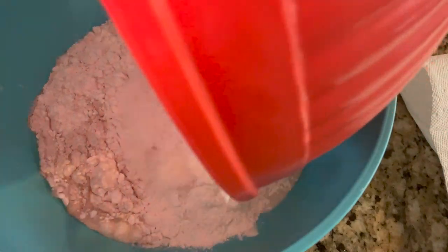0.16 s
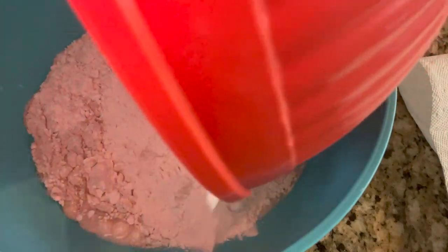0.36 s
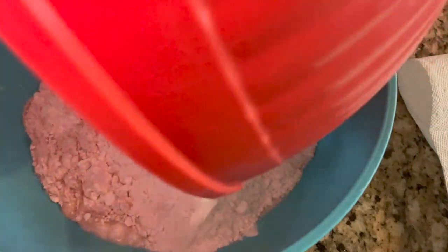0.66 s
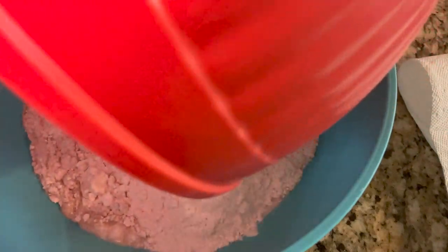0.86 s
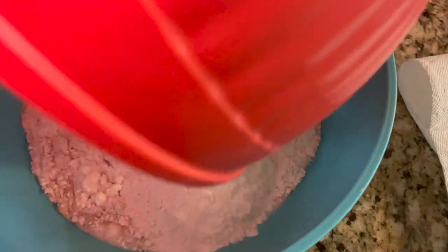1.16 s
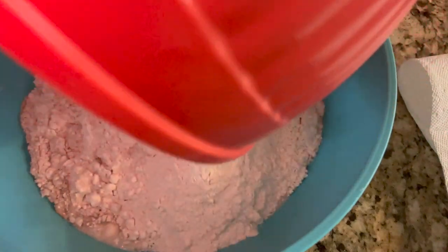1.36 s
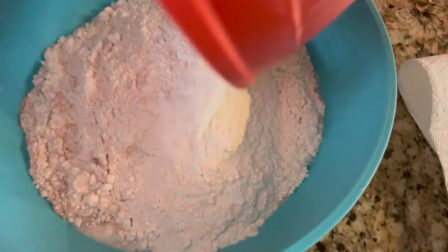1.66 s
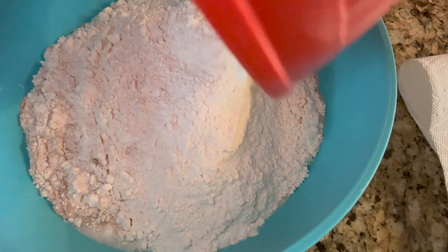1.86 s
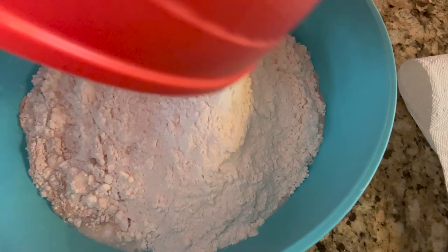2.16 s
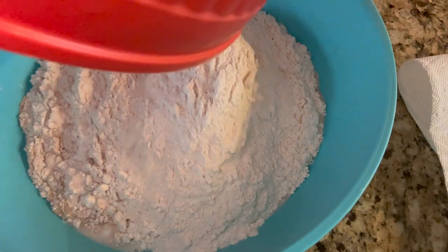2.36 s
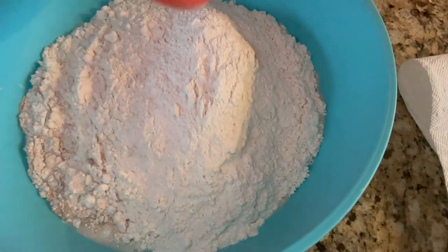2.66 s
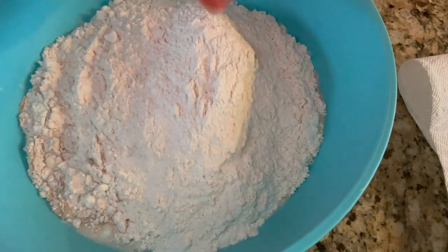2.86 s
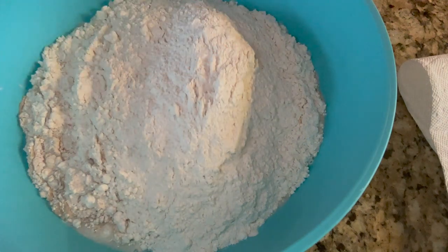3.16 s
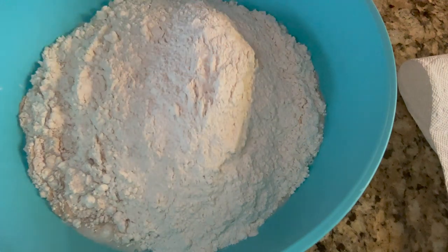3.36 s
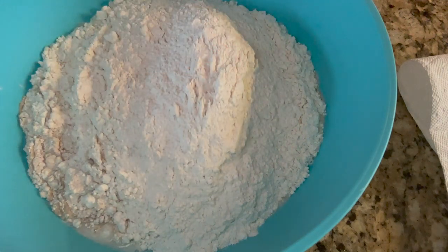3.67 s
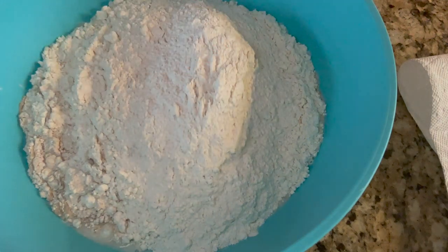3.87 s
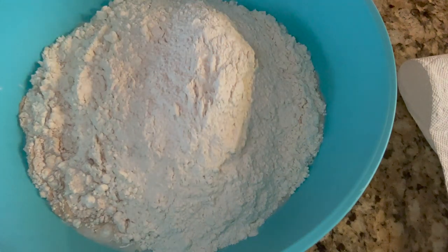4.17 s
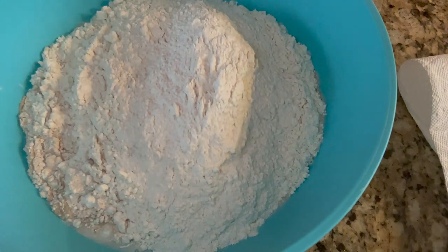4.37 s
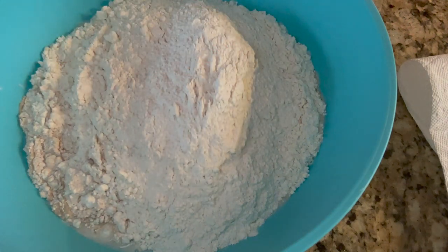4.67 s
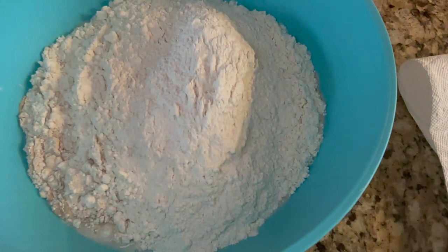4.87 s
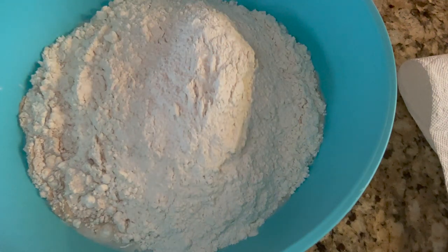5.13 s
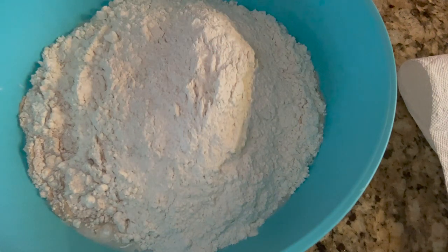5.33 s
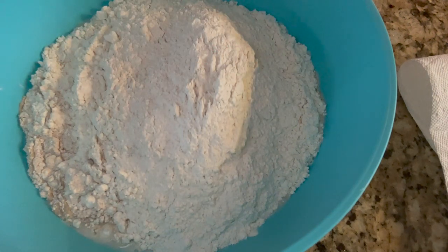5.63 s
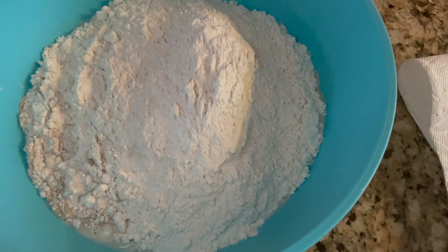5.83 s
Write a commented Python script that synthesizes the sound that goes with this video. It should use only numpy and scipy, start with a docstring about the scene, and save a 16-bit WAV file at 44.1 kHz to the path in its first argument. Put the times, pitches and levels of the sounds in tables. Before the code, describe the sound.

A quiet home kitchen heard closely through a stereo phone microphone. A steady low fridge hum with faint mains buzz and soft house air runs throughout. From 0 to 1.3 s flour slides out of a plastic cup as a faint, fine, grainy hiss, with a light coarse scrape near 0.9 s and tiny ticks up to 1.8 s. Small brushes come around 2.1 and 2.35 s, then it is nearly still. From 3.0 s hands and packets rustle crisply; a stiff lid snaps clearly at 3.44 s, with a much duller click at 4.07 s. Rustling and a slight airy, resonant scrape grow from 4.5 s. At 4.76 s the cup slams onto the stone counter: a very loud, short, clipped hollow thud with plastic crack, rattle and brief room echo. Weaker taps follow at 4.9, 5.08, 5.16, 5.25 and 5.37 s as it rocks to rest. Hum remains, with one tiny brush near 5.9 s.

```python
"""Cup set down in a quiet kitchen

Flour slides out of a plastic cup, hands and packets rustle and a lid clicks, over fridge hum and house air.
Then the cup is set down hard on a stone counter and rocks to rest. Blows and clicks are decaying modes
with a noise echo, rustles are shaped grains, gliding resonances are narrow noise, hum is tones and noise.
A phone's paired ports hear the sound with different phase, the treble in near opposite phase.
"""
import sys
import numpy as np
from scipy import signal
from scipy.fft import rfft, irfft
from scipy.io import wavfile
from scipy.ndimage import uniform_filter1d

SR = 44100
rng = np.random.default_rng(int(sys.argv[2]) if len(sys.argv) > 2 else 0)


def unload_audio(sound):
    """Save the sound as a 16-bit wav file, at the path given as the first command line argument."""
    columns = np.transpose(np.atleast_2d(sound))
    # keep every value between -1 and 1, then stretch to whole-number steps
    steps = np.round(np.clip(columns, -1, 1) * 32767)
    wavfile.write(sys.argv[1], SR, steps.astype(np.int16))


N = 264600
T = np.arange(N) / SR  # s
HZ = np.arange(N // 2 + 1) * SR / N + 1e-6  # kept above zero for the logarithms
LN_1000 = np.log(1000)  # a 60 dB fall

# port pair: [f/Hz, likeness 0-1, right port's lead for diffuse sound/rad, its lead for direct sound/rad]
PORT_PAIR = [(40.2, 1, .1, 2), (165, 0.89, 0.34, -1.16), (385, 0.38, 0.8, -1.67), (495, 0.46, 2.4, -1.5),
             (687, 0.35, 3, -2), (1120, 0.39, 4.42, -2), (1290, 0.31, 3.5, -4), (2390, 0.081, 1.1, -8.5),
             (6100, 0.069, 4.9, -5), (7800, 0.66, 4.4, -12), (8550, 0.89, 4.4, -7), (9460, 1, np.pi, -9),
             (12800, 1, np.pi, -9.5), (13700, .85, 2.1, -4.5), (15500, .55, .9, -10)]


def undb(db):
    """Decibels to amplitude."""
    return 10 ** (np.asarray(db) / 20)


def level(x, db):
    """Set the RMS level."""
    return x * undb(db) / np.sqrt(np.mean(x ** 2))


def across(table, column):
    """A table column over all frequencies, straight on a log axis."""
    return np.interp(np.log(HZ), np.log([row[0] for row in table]), [row[column] for row in table])


def shaped(x, gain):
    """Filter by a gain, or a phase turn, at every frequency."""
    return irfft(rfft(x) * gain, N)


def humps(table):
    """Summed gain of resonances [f/Hz, full width at half amplitude/Hz, level/dB]."""
    return sum(undb(db) / (1 + (2 * (HZ - hz) / width) ** 2) for hz, width, db in table)


def walk(rate):
    """Smoothed random drift of RMS 1, with `rate` new values a second."""
    k = int(SR / rate)
    steps = np.repeat(rng.standard_normal(N // k + 1), k)
    smooth = uniform_filter1d(uniform_filter1d(steps, k), k)
    return level(smooth[:N], 0)


def ring(modes, stretch, rise_ms):
    """Decaying modes of alternate sign that build up while the contact lasts; peak 1, t60 times stretch."""
    t = T[:int(.45 * SR)]
    y = 0
    for k, (hz, db, t60) in enumerate(modes):
        decay = np.exp(-LN_1000 * t / (t60 * stretch))
        y = y + (-1) ** k * undb(db) * decay * np.sin(2 * np.pi * hz * t)
    y = y * (1 - np.exp(-1000 * t / rise_ms))
    return y / np.max(np.abs(y))


def add(out, sound, s, pan_db):
    """Place a sound at s seconds, with left louder than right by pan_db."""
    i = int(s * SR)
    out[:, i:i + sound.shape[-1]] += sound[..., :N - i] * undb(np.array([[pan_db], [-pan_db]]) / 2)


def knocks():
    """Each blow thuds, taps and cracks at once; the counter, a slower ring and a grainy chatter build behind."""
    # the cup meets the counter; blow sets the whole hit, upper is relative to the lingering ring:
    # [t/s, blow/dB, wall tap/dB, rim crack/dB, lingering ring/dB, counter/dB, upper modes/dB,
    #  kitchen echo/dB, left minus right/dB]
    contacts = [(4.7627, 6.5, -18.5, -16.5, -13, -16.5, 4, -9.5, 0.5),
                (4.9014, -26.5, 0, -9, -23, -20, -5, 0, 10), (5.0784, -14.5, 3, -30, -7.5, -5, -14, -5, 0),
                (5.1619, -17.5, 7, 4, -9, -9, -2, -5, 4), (5.231, -33, 6, -22, -1, -3.5, -14, 2, -6),
                (5.2612, -32.5, 15.5, -15, -11, -20, -10, -13, 1),
                (5.3751, -51, 18, -7, -22, -25, -7, -17, -1)]
    # All mode tables: relative levels, t60 before the stretch given to ring().
    # thud of the base: [f/Hz, level/dB, t60/s]
    base_modes = [(296, -9, 0.034), (393, -11.5, 0.038), (516, -1.5, 0.051), (667, -16.5, 0.0095),
                  (750, -16, 0.044), (1426, -17, 0.023)]
    # tap of the thin wall: [f/Hz, level/dB, t60/s]
    wall_modes = [(813, -2.5, 0.029), (1100, 3, 0.0098), (1450, -4, 0.016), (1900, -10.5, 0.015),
                  (2328, 1.5, 0.022), (2780, -10, 0.012), (3100, -10, 0.019), (3413, -6.5, 0.021),
                  (3890, -18, 0.022)]
    # what lingers in cup and counter: [f/Hz, level/dB, t60/s]
    linger_modes = [(267, -9, .22), (359, -10, .25), (392, -11, .2), (445, -9, .18), (500, -14, .15),
                    (515, 0, .38), (550, -7, .22), (625, -11, .25), (670, -19, .2)]
    # upper modes of the lingering ring: [f/Hz, level/dB, t60/s]
    upper_modes = [(932, 1.5, 0.23), (1010, -6, 0.38), (1095, -2.5, 0.29), (1530, -9.5, 0.27),
                   (1601, -1, 0.27), (1647, -9.5, 0.39), (1700, -8.5, 0.28), (1890, -12, 0.22),
                   (1930, -10, 0.23), (2100, -7.5, 0.15), (2518, -3.5, .2), (2630, -7.5, 0.2),
                   (2670, -9, 0.15), (3050, -9, 0.2)]
    # the slab and the cabinet under it, answering late: [f/Hz, level/dB, t60/s]
    counter_modes = [(78, -10, 0.28), (133.5, 3.5, 0.15), (173, -4.5, 0.22), (250, -6.5, 0.14),
                     (296.6, 6.5, 0.13)]
    rattle_t60_s, rattle_damp = 0.69, 0.3  # fall of the jolts; shortening of the modes they strike

    near, far = np.zeros((2, 2, N))
    base, wall = ring(base_modes, 0.47, rise_ms=3.6), ring(wall_modes, 0.63, rise_ms=1.7)
    # the tap that reaches the walls of the room is a blunt push
    push_t60 = LN_1000 * 0.00035
    glance = ring([(1940, 0, push_t60), (3350, -9.5, push_t60)], 0.91, rise_ms=.1)
    low, high = ring(linger_modes, 1.0, rise_ms=1.4), ring(upper_modes, 0.83, rise_ms=2.6)
    counter = ring(counter_modes, 0.93, rise_ms=13.3)
    low_chatter = ring(linger_modes, rattle_damp, rise_ms=1.3)
    high_chatter = ring(upper_modes, rattle_damp, rise_ms=0.31)
    t = T[:len(base)]
    wall = wall * (1 - np.exp(-t / .0012)) * undb(2.5)  # the thin wall takes the blow a moment late
    rim = signal.butter(1, [3000, 7500], "band", fs=SR, output="sos")
    jolt_fall = np.exp(-LN_1000 * t / rattle_t60_s)

    noises = rng.standard_normal((len(contacts), 3, len(t)))
    for contact, noise in zip(contacts, noises):
        s, db, wall_db, crack_db, linger_db, counter_db, upper_db, echo_db, pan_db = contact
        crack_shape = np.exp(-t / 0.0021) * (1 - np.exp(-t / 0.0019)) ** 2
        crack = signal.sosfilt(rim, noise[0]) * crack_shape * undb(7.0 + crack_db)
        blow = base + wall * undb(wall_db) + crack

        # unlike noise at the two ports, in grains of uneven strength, strikes the damped modes
        upper = undb(upper_db - 11)
        grain_db = 3 * level(uniform_filter1d(noise[0], size=250), 0)
        jolts = noise[1:] * undb(grain_db) * jolt_fall
        chatter = low_chatter + undb(13.0) * upper * high_chatter
        rattle = signal.fftconvolve(chatter[None], jolts, axes=1)[:, :len(t)]
        rattle = undb(-9.5) * rattle / np.sqrt(np.sum(jolts ** 2))
        tail = low + upper * high + rattle

        hit = blow + counter * undb(counter_db) + tail * undb(linger_db)
        add(near, hit * undb(db), s, pan_db)
        # only the sharp part goes to the kitchen
        sharp = base * undb(-3.0) + glance * undb(wall_db) + crack
        add(far, sharp * undb(db + echo_db), s, 0)
    return near, echo(far, wet_db=1.0)


def clicks():
    """A stiff lid snaps, ringing itself and the tub with a gritty edge; thinner ticks are brief mode trios."""
    # snaps: [t/s, level/dB, t60 stretch, brightness/dB per octave, tub body/dB, left minus right/dB]
    snaps = [(3.403, -45, 0.79, -11.5, 5, -13), (3.4445, -16, 0.76, 3, -5.5, -1.5),
             (4.0745, -33.5, 0.26, -14, -42, 0)]
    # the lid, relative levels, t60 before stretch: [f/Hz, level/dB, t60/s]
    lid_modes = [(2110, 1, 0.036), (2250, -3, 0.033), (2665, 4, 0.028), (3530, 2, 0.022),
                 (4100, -10, 0.016), (4840, -5, 0.016), (5670, 3.5, 0.006), (6480, -17, 0.02)]
    # the tub under the lid, likewise: [f/Hz, level/dB, t60/s]
    tub_modes = [(468, -4, 0.037), (930, -8, 0.061), (1287, -3.5, 0.038), (1735, -14, 0.067)]
    # thin ticks: [t/s, peak level/dB, centre f/Hz]
    ticks = [(.932, -44, 2600), (1.434, -44.5, 4970), (1.445, -42.5, 10900), (1.767, -39.5, 11850),
             (4.315, -60, 6500), (4.5955, -36, 4600), (4.717, -38, 6300), (4.732, -38.5, 3200),
             (5.065, -43, 7450), (5.193, -49, 6100), (5.3747, -37.5, 7000)]

    near, far = np.zeros((2, 2, N))
    t = T[:2000]
    noises = rng.standard_normal((len(snaps), 2, len(t)))
    for (s, db, stretch, bright_db, tub_db, pan_db), noise in zip(snaps, noises):
        lowest_hz = lid_modes[0][0]
        lid = [(hz, mode_db + bright_db * np.log2(hz / lowest_hz), t60) for hz, mode_db, t60 in lid_modes]
        grit_ring = ring(lid, 0.32, rise_ms=0.16)[None, :400]
        grit = signal.fftconvolve(grit_ring, noise * np.exp(-t / 0.013), axes=1) * undb(-29)
        tub = ring(tub_modes, stretch, rise_ms=0.96) * undb(tub_db)
        snap = ring(lid, stretch, rise_ms=1.0) + tub
        add(near, snap * undb(db), s, pan_db)
        add(near, grit * undb(db), s, pan_db)
        # the kitchen gets a shorter snap without grit
        far_tub = ring(tub_modes, .4 * stretch, rise_ms=0.97) * undb(tub_db)
        far_snap = ring(lid, 0.5 * stretch, rise_ms=0.71) + far_tub
        add(far, far_snap * undb(db), s, 0)
    for s, db, hz in ticks:
        trio = [(0.9 * hz, 0, .003), (hz, 0, .003), (1.32 * hz, 0, .002)]
        tick = ring(trio, 0.41, rise_ms=.05) * undb(db)
        add(near, tick, s, 0)
        add(far, tick, s, 0)
    return near, echo(far, wet_db=-1.1)


def rustle():
    """Flour, hands and packets: dense grains of uneven size in three colours, each flickering alone."""
    # continuous rustle of changing level, first flour pouring, later hands and packets:
    # [t/s, body level/dB, hiss over body/dB]
    stir = [(0, -64, 2.5), (.24, -57, 5.5), (.63, -63, 2), (.83, -63, 3.5), (1.2, -72.5, 8.5),
            (1.45, -88, -3), (2.94, -84, -2), (3.03, -61.5, 3), (3.2, -59.5, 5.5), (3.4, -59, 3.5),
            (3.64, -65.5, -11), (3.78, -68.5, 4.5), (3.9, -59, 0), (4.05, -63.5, -3), (4.28, -67.5, -1),
            (4.5, -63, -3), (4.64, -55.5, 2.5), (4.74, -45, -22), (4.9, -62, -25), (5.03, -78, -21),
            (5.14, -66, -14), (5.185, -45, -15), (5.32, -62, -14), (5.5, -87, -2), (6, -81, 8)]
    # single scrapes, brushes and rattles; rasp and hiss are relative to the body:
    # [peak t/s, swell/s, fade/s, body level/dB, coarse rasp/dB, fine hiss/dB]
    strokes = [(0.885, 0.079, 0.32, -58.5, 12.5, 0), (1.17, 0.18, 0.077, -62.5, 7.5, 2.5),
               (1.349, 0.46, 0.24, -74, 17.5, 7), (2.06, 0.099, 0.7, -73.5, 12.5, -1),
               (2.351, 0.076, 0.063, -57.5, 9, 3.5), (3.015, 0.045, 0.085, -53, 3.5, 9),
               (3.423, 0.011, 0.079, -64, 18.5, 19), (3.48, .12, 0.13, -53, -8, -2),
               (4.315, 0.02, 0.12, -55, 1.5, -9), (4.589, 0.047, 0.082, -45.5, -26, -13),
               (4.763, 0.018, 0.22, -39.5, 8.5, -34), (5.235, 0.035, .06, -50.5, 6, -16),
               (5.33, .1, 0.2, -67, 16, -8), (5.925, .05, 0.043, -65.5, -15, 11)]
    # colour of the coarse rasp, relative levels: [f/Hz, width/Hz, level/dB]
    rasp = [(650, 340, 13), (1150, 300, 6), (1670, 420, -1), (2220, 410, 3.5), (2715, 500, 5.5),
            (3710, 960, -5.5)]
    # colour of the body: [f/Hz, width/Hz, level/dB]
    body = [(3500, 2800, 2.5), (6000, 6100, -3.5)]
    # colour of the fine hiss: [f/Hz, width/Hz, level/dB]
    hiss = [(8570, 3400, 0), (11400, 3000, -2.5), (14300, 2700, -8.5)]
    hold_s, span_db = 0.032, 20.5  # a stroke climbs and drops by span_db over its swell and its fade

    times, *columns = np.transpose(stir)
    stir_db, fine_db = (np.interp(T, times, c) for c in columns)
    power = undb([stir_db + 3, stir_db, stir_db + fine_db]) ** 2
    for s, swell, fade, db, rasp_db, hiss_db in strokes:
        away = np.maximum((s - T) / swell, (T - s - hold_s) / fade)
        away = np.clip(away, 0, None)
        power = power + undb(db - span_db * away) ** 2 * undb([[rasp_db], [0], [hiss_db]]) ** 2
    out = 0
    for colour, gain in zip((rasp, body, hiss), np.sqrt(power)):
        size_db = 2.4 * np.minimum(rng.exponential(size=N), 5)
        grains = rng.standard_normal((2, N)) * undb(size_db)
        flicker_db = .5 * walk(25) + 2.2 * walk(110)
        out = out + level(shaped(grains, humps(colour)), 0) * gain * undb(flicker_db)
    return out


def gliding_resonances():
    """Resonant noise bands, mostly gliding as the cup nears the counter, with randomly wavering level."""
    # narrow bands, level ahead of the swell and wavering:
    # [t/s, length/s, from f/Hz, to f/Hz, width/Hz, level/dB]
    glides = [(4.312, 0.05, 2320, 2320, 140, -49), (4.58, 0.17, 5950, 6750, 450, -54),
              (4.56, 0.23, 2350, 2550, 600, -51), (4.49, 0.13, 5200, 5500, 450, -59),
              (4.53, 0.14, 3600, 4200, 700, -55), (4.68, .09, 3100, 3300, 600, -52)]
    out = 0
    for s, length, from_hz, to_hz, width, db in glides:
        along = np.clip((T - s) / length, 0, 1)
        glide_hz = from_hz + (to_hz - from_hz) * along
        tone = np.sin(2 * np.pi * np.cumsum(glide_hz) / SR)
        slow_noise = shaped(rng.standard_normal((2, N)), humps([(0, width, 0)]))
        swell = np.sin(np.pi * along)
        out = out + level(slow_noise * tone, db) * swell * undb(2.8 * walk(70))
    return out


def fridge():
    """The casing and the room ring as narrow noise bands; the steadier motor tones wander in pitch and level."""
    # hum of the casing and resonances of the room: [f/Hz, wander width/Hz, level/dB]
    hum_bands = [(57, 8.8, -55), (98.2, 6.7, -49.5), (119.6, 5.9, -45.5), (135, 8.2, -50.5),
                 (152.2, 13, -54), (186.2, 13, -55), (223.2, 6, -51.5), (243, 9, -59), (638, 9, -58),
                 (2570, 270, -81.5)]
    # motor turn rate and mains buzz, level before its wander: [f/Hz, level/dB]
    motor_tones = [(58.5, -50.5), (119.8, -44.5)]
    hum = 0
    for hz, width, db in hum_bands:
        band = shaped(rng.standard_normal((2, N)), humps([(hz, width, 0)]))
        hum = hum + level(band, db)
    motor = 0
    for hz, db in motor_tones:
        phase = 2 * np.pi * np.cumsum(hz + 0.726 * walk(1.832)) / SR
        motor = motor + level(np.sin(phase), db) * undb(1.4 * walk(2.5))
    return hum + motor * np.array([[1], [0]])  # motor tones on the first path only


def buzz():
    """Mains overtones, each reaching the two ports with its own strength and phase."""
    buzz_hz = 119.82  # twice the mains rate
    # thin overtones, RMS level before a slight wander: [multiple of buzz_hz, left level/dB, right level/dB]
    overtones = [(2, -55, -59), (3, -58, -58), (13, -80, -80), (14, -79, -78), (16, -77, -82),
                 (17, -77, -76), (19, -81, -86), (20, -84, -90), (21, -72, -78), (22, -70, -74)]
    out = 0
    for (multiple, *side_db), turn in zip(overtones, rng.random((len(overtones), 2, 1))):
        tone = np.sin(2 * np.pi * (multiple * buzz_hz * T + turn))
        out = out + np.sqrt(2) * undb(side_db)[:, None] * tone * undb(.8 * walk(3))
    return out


def house_air():
    """Air moving through the house: coloured noise that swells a little."""
    # air and appliances, relative levels: [f/Hz, level/dB per Hz]
    spectrum = [(20, -45), (43, -17), (70, -18), (105, -5), (150, -6.5), (200, -12), (232, -10.5),
                (270, -15), (600, -19), (1100, -29), (2200, -39.5), (2650, -44), (3200, -52), (5000, -56.5),
                (9000, -57.5), (16000, -64)]
    air = shaped(rng.standard_normal((2, N)), undb(across(spectrum, 1)))
    return level(air, -41) * undb(.5 * walk(1.6))


def echo(x, wet_db):
    """The kitchen answers with two unrelated noise tails, each band dying at its own rate."""
    # kitchen echo, relative strengths: [f/Hz, t60/s, strength/dB]
    kitchen_bands = [(141.5, 0.45, 13), (596, 0.61, -5), (1540, 0.44, -11), (3100, 0.59, -12.5),
                     (6800, 0.13, 0.5), (13900, 0.4, -8.5)]
    t = T[:int(.8 * SR)]
    noise, tail = rng.standard_normal((2, N)), 0
    for hz, t60, db in kitchen_bands:
        band = shaped(noise, np.exp(-(np.log2(HZ / hz)) ** 2))[:, :len(t)]
        onset = np.clip(t / 0.0047, 0, 1)
        tail = tail + undb(db) * band * np.exp(-LN_1000 * t / t60) * onset
    tail = tail / np.sqrt(np.sum(tail ** 2, axis=1, keepdims=True))
    return undb(wet_db) * signal.fftconvolve(x, tail, axes=1)[:, :N]


def ports(first, second):
    """Diffuse sound: left hears one path; right hears it turned in phase, mixed with a second path."""
    like = np.clip(across(PORT_PAIR, 1), 0, 1)
    turned = shaped(first, like * np.exp(1j * across(PORT_PAIR, 2)))
    return np.array([first, turned + shaped(second, np.sqrt(1 - like ** 2))])


def scene():
    """Direct blows and snaps with the right port turned in phase, mains buzz, and all diffuse sound."""
    (blows, blow_echo), (snaps, snap_echo) = knocks(), clicks()
    left, right = blows + snaps
    direct = np.array([left, shaped(right, np.exp(1j * across(PORT_PAIR, 3)))])
    diffuse = house_air() + fridge() + rustle() + gliding_resonances() + blow_echo + snap_echo
    return direct + buzz() + ports(*diffuse)


def record(dry):
    """Peaks beyond full scale clip at the input, then the deepest bass and the top are cut."""
    clipped = np.clip(dry, -1, 1)
    held = signal.sosfilt(signal.butter(2, 30, "high", fs=SR, output="sos"), clipped)
    return signal.sosfilt(signal.ellip(10, .2, 80, 15900, fs=SR, output="sos"), held)  # top edge in Hz


dry = scene()
out = record(dry)
unload_audio(out)
```